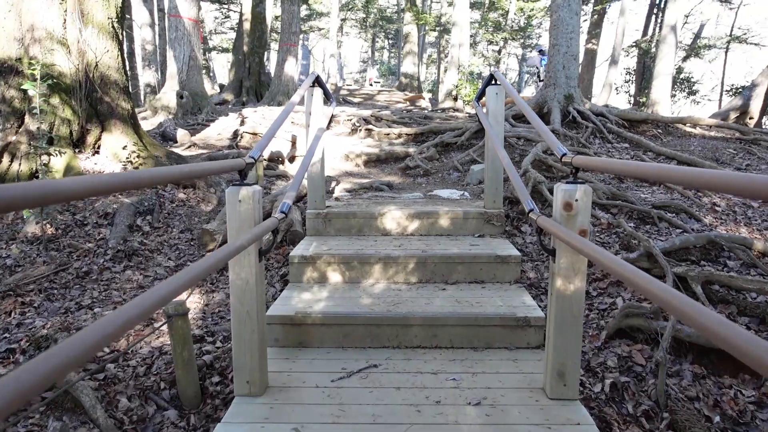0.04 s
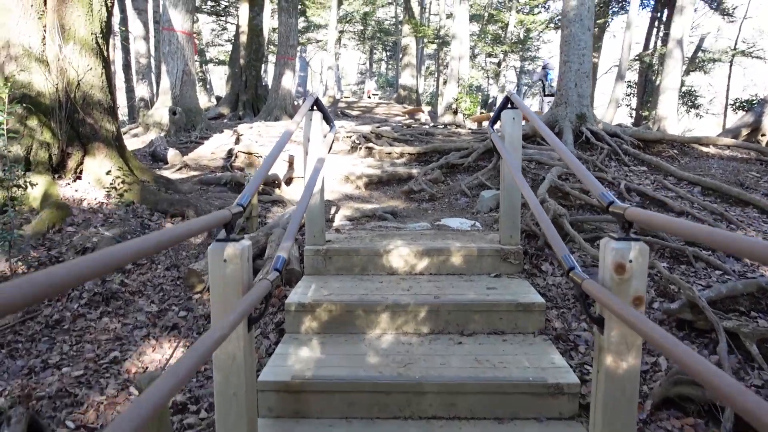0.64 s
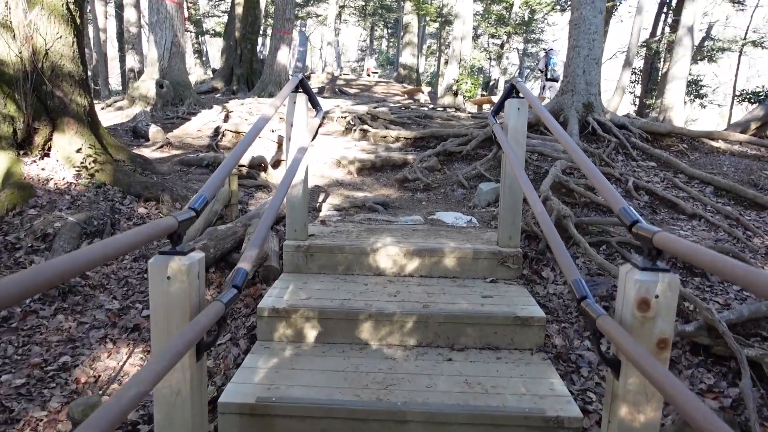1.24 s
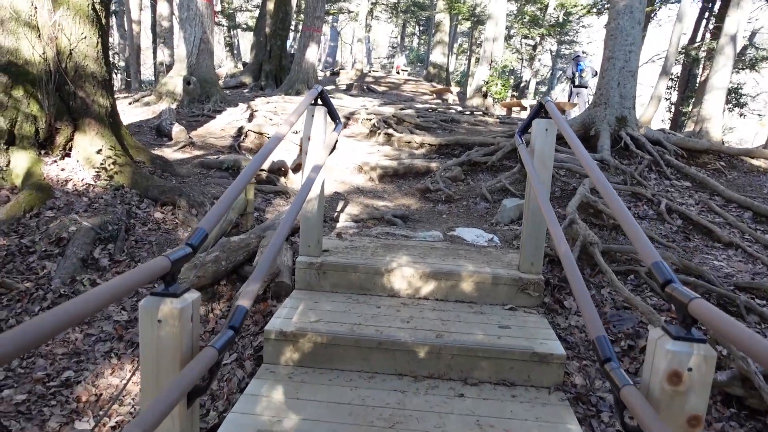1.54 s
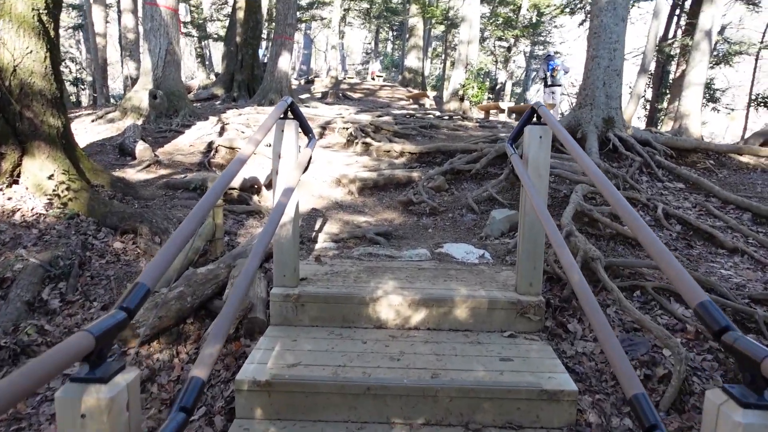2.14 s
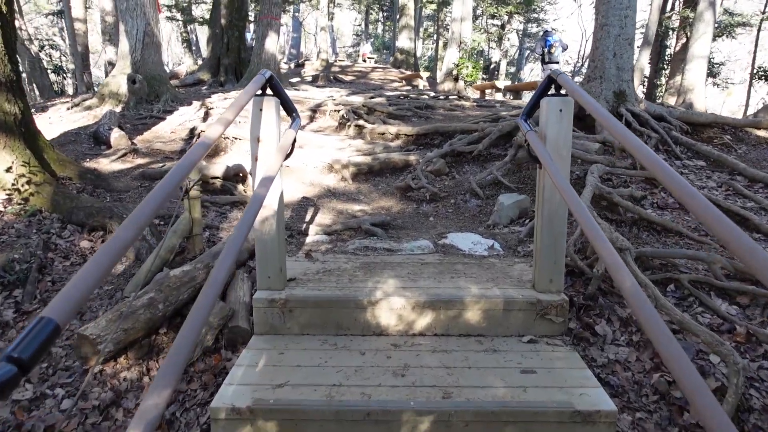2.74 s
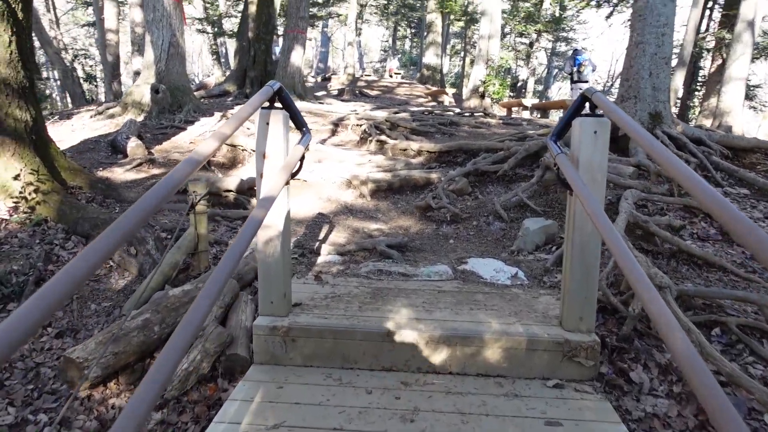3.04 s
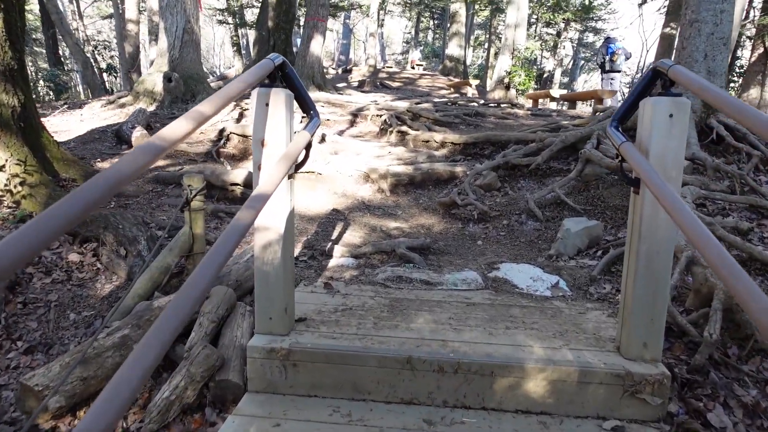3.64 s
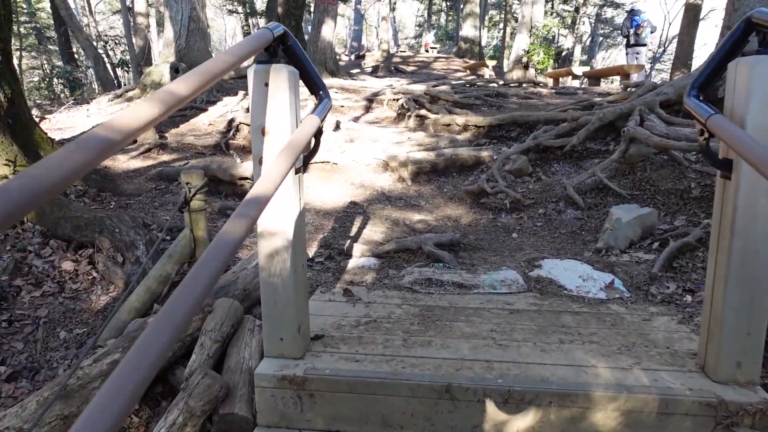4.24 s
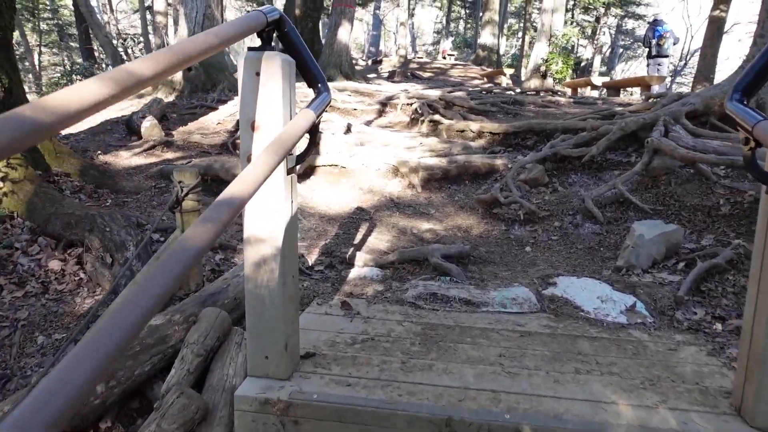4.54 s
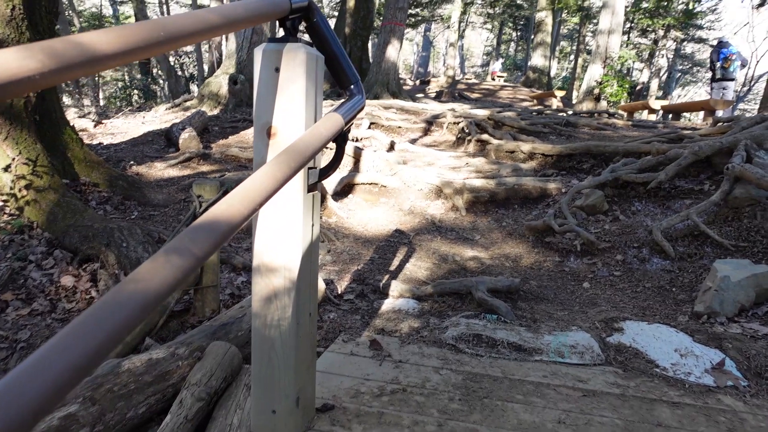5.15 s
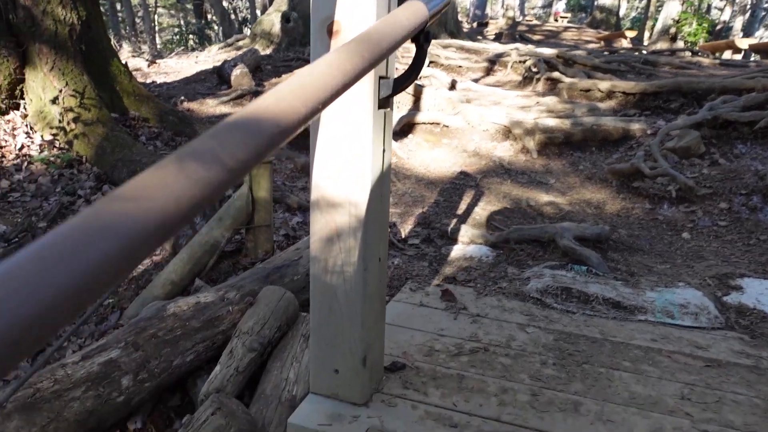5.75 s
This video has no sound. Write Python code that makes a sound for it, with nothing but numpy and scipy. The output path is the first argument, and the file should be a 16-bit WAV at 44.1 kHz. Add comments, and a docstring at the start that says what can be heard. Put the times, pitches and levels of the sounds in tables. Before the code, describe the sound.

A hiker walks across a wooden landing and up a few steps in a quiet forest. The footfalls are dull, hollow thuds just below the microphone, unevenly spaced, each leaving a brief low rumble in the timber. Rubber soles slap lightly and grit ticks and crunches under them. A jacket swishes softly close by, a little more near the end, over a faint steady hiss of the woods.

```python
"""A hiker's footsteps on a wooden landing and a short flight of steps in a forest, camera in hand.
Just below the microphone, heel and sole push on the planks, which thud in a few resonant bands
and set the timber frame rumbling. Rubber soles slap, and grit ticks and crunches under them.
Close by, a jacket swishes; farther off lies the steady hiss of the woods."""
import sys
import numpy as np
from scipy import signal
from scipy.fft import rfft, irfft
from scipy.io import wavfile
from scipy.ndimage import uniform_filter1d

SR = 44100
rng = np.random.default_rng(int(sys.argv[2]) if len(sys.argv) > 2 else 0)


def unload_wav(signal):
    """Save mono or channel-first audio to the path in sys.argv[1] as 16-bit WAV at rate SR, clipped to [-1, 1]."""
    wavfile.write(
        sys.argv[1],
        SR,
        np.round(np.clip(np.atleast_2d(signal).T, -1, 1) * 32767).astype(np.int16),
    )


N = 264864
TIME = np.arange(N) / SR
STAIRS_FROM_S = 1.5  # the hiker leaves the landing
TOP_HZ = 15850  # upper limit of the camera's microphone


def undb(db):
    """Decibels to gain."""
    return 10 ** (np.asarray(db) / 20)


def unit(x):
    """Scale to rms 1."""
    return x / np.sqrt(np.mean(x ** 2))


def curve(rows):
    """Gain at every sample from (s, dB) rows."""
    return undb(np.interp(TIME, *np.transpose(rows)))


def wander(rate_hz):
    """Smooth random wandering, spread near 1."""
    hold = int(SR / rate_hz)
    steps = np.repeat(rng.standard_normal(N // hold + 1), hold)
    return uniform_filter1d(steps, hold)[:N]


def add(out, s, sound):
    """Mix a sound in from time s on."""
    start = max(int(s * SR), 0)
    part = sound[..., :N - start]
    out[..., start:start + part.shape[-1]] += part


def highpass(x, order, hz):
    """Roll off the sound below hz."""
    return signal.sosfilt(signal.butter(order, hz, "high", fs=SR, output="sos"), x)


def colour(x, spectrum):
    """Shape a sound with a spectrum of (Hz, dB) rows."""
    hz, db = np.transpose(spectrum)
    size = x.shape[-1]
    bins = np.maximum(np.fft.rfftfreq(size, 1 / SR), 1)
    gain = undb(np.interp(np.log(bins), np.log(hz), db))
    return irfft(rfft(x) * gain, size)


def widen(x, side_db, taps=256):
    """Mono to stereo: scattered sound differs between the microphone's ports, but not in the bass."""
    scatter = rng.standard_normal(taps) * np.linspace(1, 0, taps) ** 2
    scattered = signal.fftconvolve(x, scatter / np.linalg.norm(scatter))[:len(x)]
    side = highpass(scattered, order=2, hz=500)
    return x + undb(side_db) * np.array([side, -side])


def diffuse(spectrum, side_db):
    """Coloured stereo noise, alike at both microphone ports in the bass."""
    mid, side = unit(colour(rng.standard_normal((2, N)), spectrum))
    side = highpass(side, order=1, hz=750)
    return mid + undb(side_db) * np.array([side, -side])


def showers(events, spectrum, grain_db):
    """Fading showers of tiny contacts from (s, dB, T60 s) rows; their sizes scatter by grain_db."""
    out, t = np.zeros(N), TIME[:SR // 4]
    for s, db, t60 in events:
        noise, size = rng.standard_normal((2, len(t)))
        grains = unit(colour(noise * undb(grain_db * size), spectrum))
        add(out, s, undb(db) * grains * undb(-60 * t / t60))
    return out


# Forest air all round the microphone. Each row: frequency in Hz, relative level in dB.
AIR_SPECTRUM = [(24, -66), (40, -62), (120, 0), (229, -3.5), (317, 5), (368, -3.5), (427, -5.5),
                (535, -7.5), (722, -9), (1050, -16.5), (1310, -14.5), (2450, -14), (3140, -21),
                (7160, -24.5), (15500, -47.5)]
# The woods in the distance. Each row: frequency in Hz, relative level in dB.
HISS_SPECTRUM = [(1500, -28), (3800, -9.5), (6200, -4), (8500, -6.5), (12000, -11.5), (16000, -78)]
# That hiss opens up towards the top of the steps. Each row: time in seconds, level in dB.
HISS_LEVELS = [(0.0, -61), (1.0, -62), (1.6, -63.5), (2.6, -61.5), (4.3, -56.5), (5.4, -55.5), (6.01, -60)]

def forest():
    """Forest air and far hiss waver slowly."""
    air = diffuse(AIR_SPECTRUM, side_db=-5.5) * undb(-58.5 + 0.5 * wander(rate_hz=2.5))
    hiss = diffuse(HISS_SPECTRUM, side_db=-9.5) * curve(HISS_LEVELS) * undb(0.6 * wander(rate_hz=3.3))
    return air + hiss


# Strained timber below the microphone. Each row: frequency in Hz, relative level in dB.
MURMUR_SPECTRUM = [(40, -33.5), (90, -9.5), (140, -0.5), (220, -5.5), (320, -7.5), (430, -18.5),
                   (700, -21.5), (1500, -29), (5000, -33)]

def timber_murmur(load, rest_db=-60, loaded_db=-46.5, waver_db=2.5):
    """The timber murmurs faintly at rest and louder under the shifting weight."""
    gain = np.hypot(undb(rest_db), undb(loaded_db) * load ** 0.41)
    return diffuse(MURMUR_SPECTRUM, side_db=-4.5) * gain * undb(waver_db * wander(rate_hz=18))


# Jacket cloth, close to the microphone. Each row: frequency in Hz, relative level in dB.
CLOTH_SPECTRUM = [(500, -3), (2300, -2), (4500, -6), (8000, -5.5), (11000, 0), (15500, -0.5)]
# Arm swings. Each row: fastest moment in seconds, rub in dB, half length in seconds, whistle in dB.
ARM_SWINGS = [(0.306, -62.5, 0.081, -65), (0.554, -58, 0.079, -64), (0.97, -55, 0.15, -64),
              (1.33, -69, 0.1, -80), (2.124, -58, 0.12, -78), (2.27, -62, 0.08, -72),
              (2.68, -66, 0.04, -71), (2.856, -57, 0.074, -76), (3.24, -64, 0.15, -77),
              (3.696, -57, 0.12, -98), (4.075, -57.5, 0.14, -93), (4.553, -59.5, 0.14, -68),
              (5.082, -60.5, 0.28, -67), (5.636, -52.5, 0.2, -74), (5.953, -48.5, 0.15, -64)]

def jacket(rest_db=-66.5, weave_hz=13800, weave_width_hz=700):
    """Rubbing cloth swells and fades with each arm swing; the ribbed weave adds a thin whistle."""
    rub_power, whistle_power = np.full(N, undb(rest_db) ** 2), np.zeros(N)
    for s, rub_db, half_s, whistle_db in ARM_SWINGS:
        swell = np.exp(-((TIME - s) / half_s) ** 2)
        rub_power += undb(rub_db) ** 2 * swell
        whistle_power += undb(whistle_db) ** 2 * swell
    cloth = diffuse(CLOTH_SPECTRUM, side_db=-12) * np.sqrt(rub_power)
    weave = signal.iirpeak(weave_hz, weave_hz / weave_width_hz, fs=SR)
    whistle = unit(signal.lfilter(*weave, rng.standard_normal(N))) * np.sqrt(whistle_power)
    flutter = undb(0.78 * wander(rate_hz=41))
    return (cloth + whistle) * flutter


# Footfalls and soft shifts of the foot, just below the microphone. Each row: start in seconds,
# heel impulse in dB, heel contact in milliseconds, tuning of the loaded wood as a ratio,
# roll from heel to sole in seconds, sole impulse in dB, relative level of the rubber's slap in dB.
FOOTSTEPS = [(0.1482, -14.5, 0.3, 0.83, 0.016, -4, -42), (0.269, -6, 2.93, 1.17, 0.026, -12.5, -63),
             (1.089, 11, 1.87, 1.09, 0.023, 12.5, -35.5), (1.9884, 0, 1.94, 0.93, 0.017, 4.5, -52),
             (2.0377, -10.5, 0.71, 1.06, 0.030, 0, -43.5), (2.101, -2.5, 0.98, 1.17, 0.019, 15, -36.5),
             (2.332, -10, 2.4, 0.93, 0.025, -27, -70), (2.8126, -3, 0.7, 0.81, 0.029, 10.5, -45),
             (2.9089, -17, 0.62, 0.94, 0.030, 4.5, -47.5), (3.5719, 17.5, 3.3, 1.015, 0.037, 12, -36),
             (3.6768, 0.5, 1.5, 1.04, 0.03, 5.5, -35.5), (4.1123, 21, 4.45, 0.977, 0.038, 1, -44.5),
             (4.4446, 4.4, 1.1, 0.83, 0.026, 11, -53), (4.514, 3.5, 1.3, 0.91, 0.025, 7, -50),
             (5.1172, 2, 0.27, 1.064, 0.013, 7, -37), (5.1651, 16, 3.5, 0.83, 0.0303, 11.5, -47),
             (5.3323, -3, 3.1, 1.03, 0.03, -5, -47), (5.8804, 10.5, 1.19, 1, 0.013, -5, -36)]

def pushes(from_s, until_s, sole_contact_ms=3.43, sole_sag=0.88):
    """Each foot pushes twice: the heel, then the soft sole, whose weight lowers the wood's tuning."""
    for s, heel_db, heel_contact_ms, tuning, roll_s, sole_db, _ in FOOTSTEPS:
        if from_s <= s < until_s:
            yield s, heel_db, heel_contact_ms, tuning
            yield s + roll_s, sole_db, sole_contact_ms, tuning * sole_sag


def planks(blows, bands, size=32768):
    """Each blow is a short push on the wood; a softer contact leaves only the lowest bands."""
    out, jf = np.zeros(N), 1j * np.fft.rfftfreq(size, 1 / SR)
    for s, db, contact_ms, tuning in blows:
        push = undb(db) / (1 + 2 * np.pi * jf * contact_ms / 1000) ** 2
        # resonant bands, summed with alternating signs
        body = sum((-1) ** k * undb(band_db) * jf * width / (jf ** 2 + jf * width + (hz * tuning) ** 2)
                   for k, (hz, width, band_db) in enumerate(bands))
        add(out, s, irfft(push * body) * SR / 1000)
    # open planks radiate little deep bass, and it comes late, so every thud sags in pitch
    return highpass(out, order=4, hz=139.3)


# Resonant bands of the landing's thud. Each row: frequency before tuning in Hz, width in Hz, gain in dB.
LANDING_BANDS = [(132.3, 9.8, 14), (137.5, 123, 7), (188, 120, 9.5), (296.6, 44.7, 11.5), (320, 9.1, 8.5),
                 (850, 9.9, -28)]

def landing_thuds():
    """The first footfalls ring the planks of the landing."""
    return planks(pushes(0, STAIRS_FROM_S), LANDING_BANDS)


def joist_hum(thuds, hz=133, width_hz=1.64, ring_db=1):
    """The long joists under the landing hum on after a footfall."""
    return undb(ring_db) * signal.lfilter(*signal.iirpeak(hz, hz / width_hz, fs=SR), thuds)


# Posts and rails around the hiker. Each row: frequency in Hz, relative level in dB.
FRAME_SPECTRUM = [(50, -3), (90, 7.5), (135, -3), (220, -12), (330, -14.5), (450, -7), (900, 16),
                  (3000, -2)]

def frame_rumble(thuds, t60_s=0.86, rise_s=0.015, tail_db=-21):
    """The thuds spread through posts and rails and die away as a low rumble."""
    t = TIME[:SR]
    envelope = undb(-60 * t / t60_s) * (1 - np.exp(-t / rise_s))
    tail = colour(rng.standard_normal(SR), FRAME_SPECTRUM) * envelope
    low_gain = np.sqrt(np.mean(np.abs(rfft(tail)[100:350]) ** 2))  # rms over 100-350 Hz
    return undb(tail_db) * signal.fftconvolve(thuds, tail / low_gain)[:N]


# Rubber on wood, heard from above. Each row: frequency in Hz, relative level in dB.
SLAP_SPECTRUM = [(250, -15), (450, 8), (850, 2), (1300, -8), (2300, -7.5), (4500, -21), (12000, -24)]

def sole_slaps(lag_s=0.002, smack_db=4, smack_t60_s=0.018, slap_t60_s=0.12):
    """Rubber meets the plank face: a short smack, and a longer slap as the sole flattens."""
    events = []
    for s, *_, db in FOOTSTEPS:
        events += [(s + lag_s, db + smack_db, smack_t60_s), (s + lag_s, db, slap_t60_s)]
    return undb(-9) * showers(events, SLAP_SPECTRUM, grain_db=3)


def body_weight(thuds, lag_s=0.13):
    """Load on the steps, 0-1: it peaks lag_s after each thud and eases as the foot lifts."""
    t = TIME[:2 * SR] / lag_s
    bearing = (t * np.exp(-t)) ** 2
    load = np.abs(signal.fftconvolve(thuds ** 2, bearing)[:N])
    return load / load.max()


# Dirt underfoot, loudest at the top step. Each row: time in seconds, level under full load in dB.
DIRT_LEVELS = [(0, -67), (3.4, -64), (5.3, -64), (6, -49)]
# Its crackle at the microphone. Each row: frequency in Hz, relative level in dB.
DIRT_SPECTRUM = [(400, -4), (900, 5.5), (1500, -16), (2600, -2.5), (5000, -28), (15000, -24)]

def dirt_crackle(load, grains_per_s=900, grain_db=7):
    """Countless tiny grains give way under the load, a few of them much larger than the rest."""
    noise, size = rng.standard_normal((2, N))
    grains = noise * undb(grain_db * size) * (rng.random(N) < grains_per_s / SR)
    return unit(colour(grains, DIRT_SPECTRUM)) * curve(DIRT_LEVELS) * load ** 0.13


# Grit and twigs under the shoes. Each row: start in seconds, relative peak in dB, band centre in Hz.
GRIT_SNAPS = [(1.1326, -37.5, 3980), (2.0994, -33.5, 3940), (2.76, -27, 13500), (3.0275, -40, 5150),
              (4.145, -29.5, 5400), (4.1942, -35, 4320), (5.1984, -37, 2850), (5.3144, -29.5, 3300),
              (5.4495, -24.5, 2960), (5.5648, -36, 4000), (5.9174, -31, 3540), (5.9504, -39, 2900)]

def grit_snaps(band_ratio=1.65, crumble_db=-23, crumble_s=0.0018):
    """A bit of grit breaks with one sharp crack and crumbles for a few milliseconds."""
    out, t = np.zeros(N), TIME[:SR // 20]
    for s, db, hz in GRIT_SNAPS:
        force = undb(crumble_db) * rng.standard_normal(len(t)) * np.exp(-t / crumble_s)
        force[0] += 1  # the break itself
        band = [hz / band_ratio, min(hz * band_ratio, TOP_HZ)]
        crack = signal.sosfilt(signal.butter(2, band, "band", fs=SR, output="sos"), force)
        add(out, s, undb(db) * crack / np.abs(crack).max())
    return undb(1.5) * out


# Resonant bands of the stair thud; the two near 275 Hz together make one broad knock.
# Each row: frequency before tuning in Hz, width in Hz, gain in dB.
STAIR_BANDS = [(87.4, 8.7, 6), (146.2, 103, 1.5), (136.3, 23.2, 9.5), (271.9, 130.5, 16.0),
               (275.4, 157.6, 15.5), (611, 131, -5), (626, 61, -5), (372, 25, -5.5)]

def stair_thuds():
    """The later footfalls ring the treads of the stairs."""
    return planks(pushes(STAIRS_FROM_S, N / SR), STAIR_BANDS)


# Soles sliding on the stairs. Each row: start in seconds, relative level in dB.
SOLE_SLIDES = [(2.1079, -33), (2.8662, -42.5), (3.0267, -40.5), (4.1428, -35), (5.1825, -39.5),
               (5.6352, -39.5)]
# Their crunch at the microphone. Each row: frequency in Hz, relative level in dB.
SCUFF_SPECTRUM = [(400, 8), (1200, -4), (2200, 2.5), (4000, 1.5), (7000, -5.5), (15000, -11.5)]

def grit_scuffs(t60_s=0.096):
    """A sliding sole grinds the grit in a short, coarse crunch."""
    events = [(s, db, t60_s) for s, db in SOLE_SLIDES]
    return undb(-5.5) * showers(events, SCUFF_SPECTRUM, grain_db=10.5)


def scene():
    """Footfalls just below the microphone, a little to the left, with the forest all round."""
    landing = landing_thuds()
    thuds = landing + stair_thuds()
    load = body_weight(thuds)
    wood = widen(thuds + joist_hum(landing) + frame_rumble(thuds), side_db=-11.5) + timber_murmur(load)
    shoes = widen(grit_scuffs() + sole_slaps() + grit_snaps() + dirt_crackle(load), side_db=-8.5)
    lean_left = undb([[0.5], [-0.5]])
    return wood * lean_left + shoes + jacket() + forest()


def record(dry):
    """The hand-held camera cuts the highest treble steeply."""
    return signal.sosfilt(signal.ellip(10, .2, 70, TOP_HZ, fs=SR, output="sos"), dry)


dry = scene()
out = record(dry)
unload_wav(out)
```